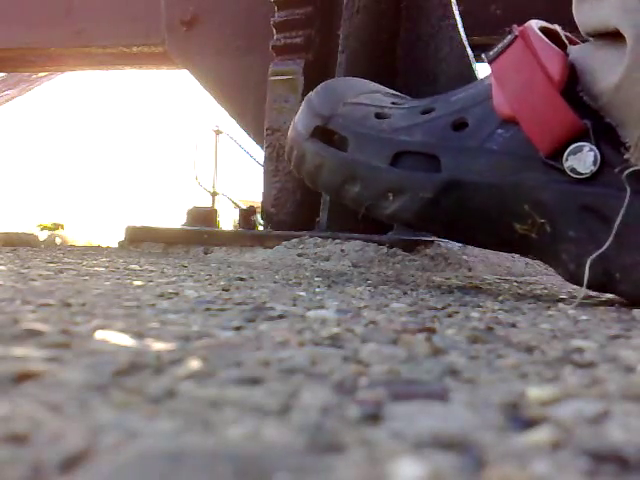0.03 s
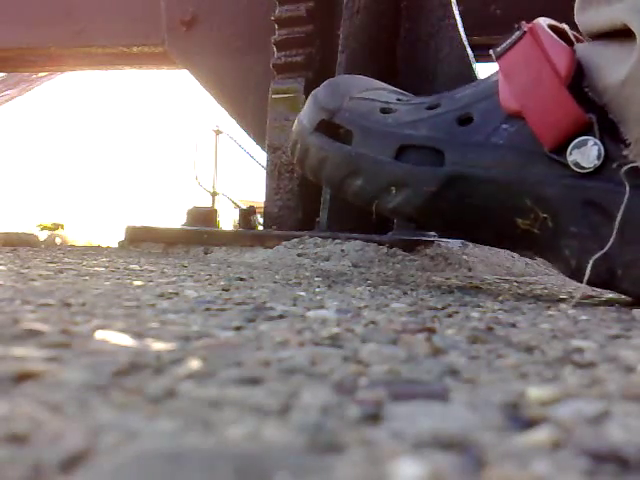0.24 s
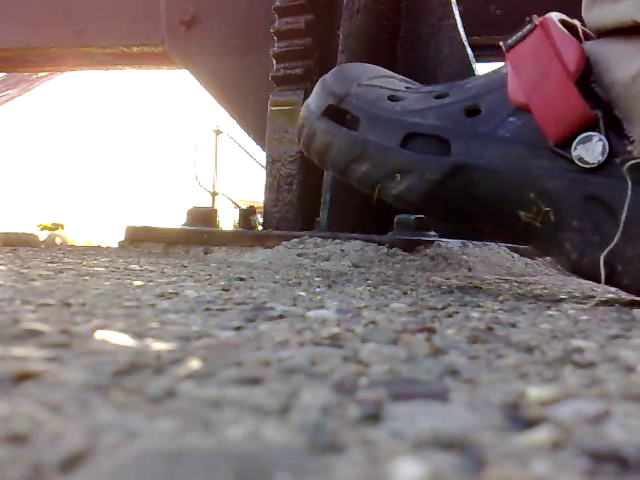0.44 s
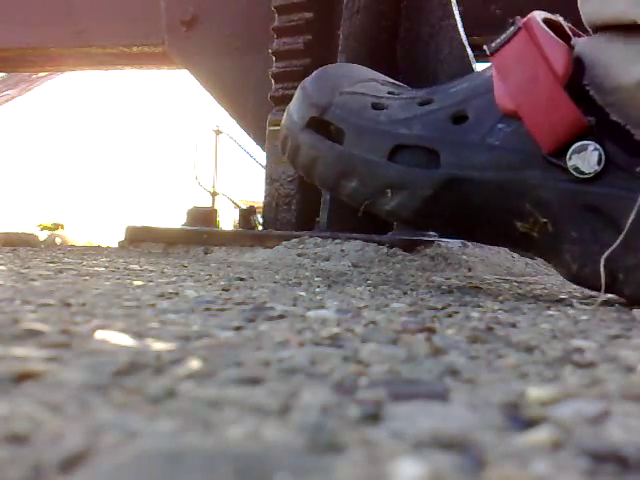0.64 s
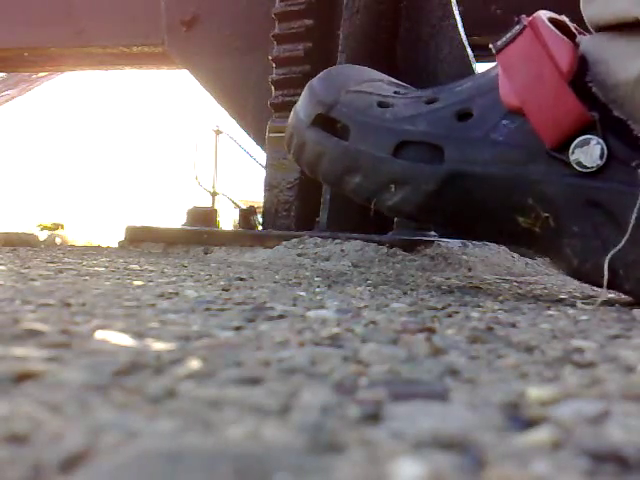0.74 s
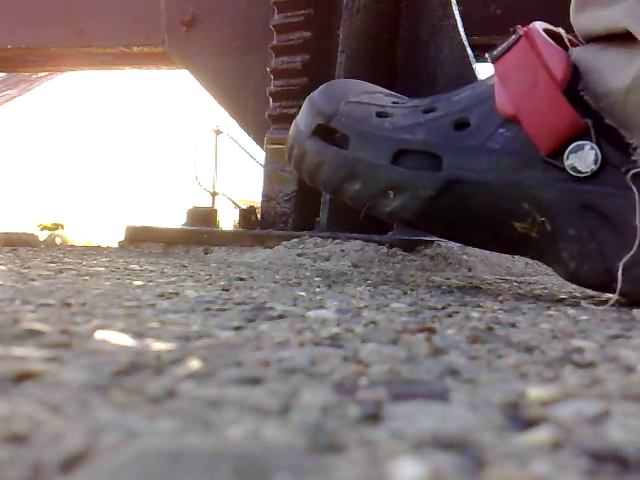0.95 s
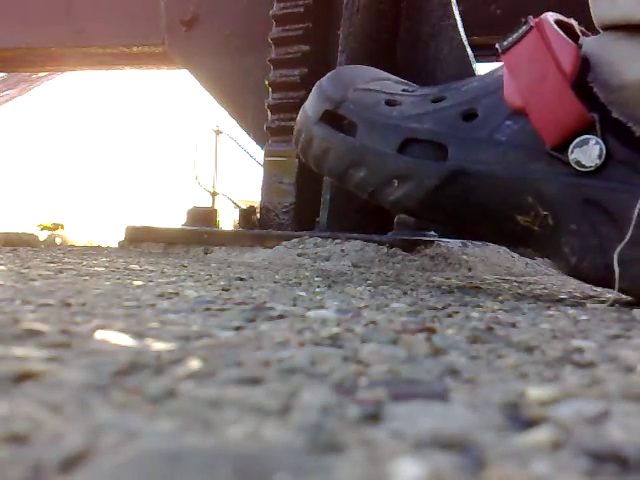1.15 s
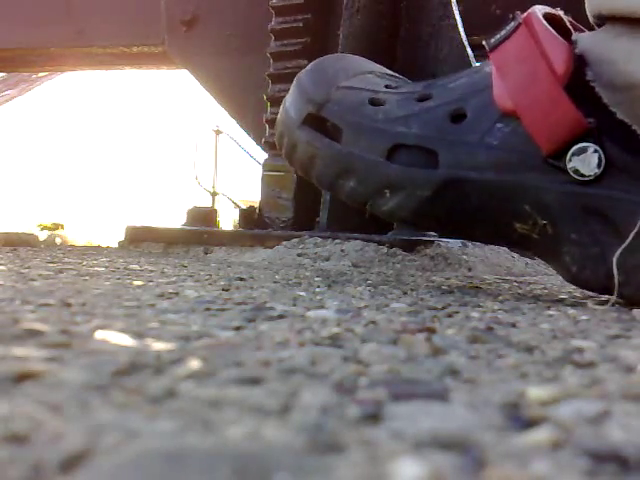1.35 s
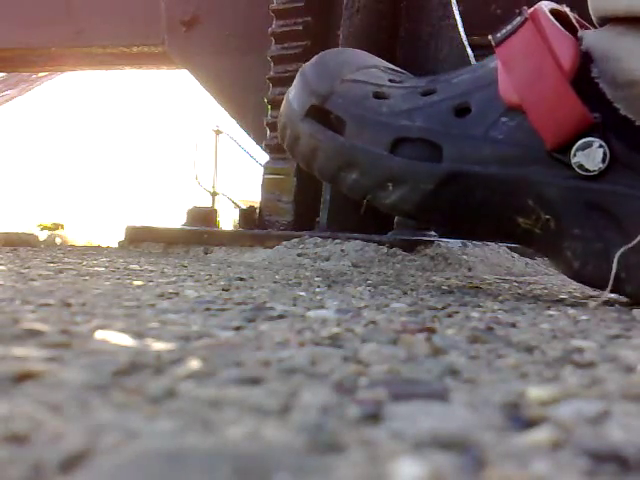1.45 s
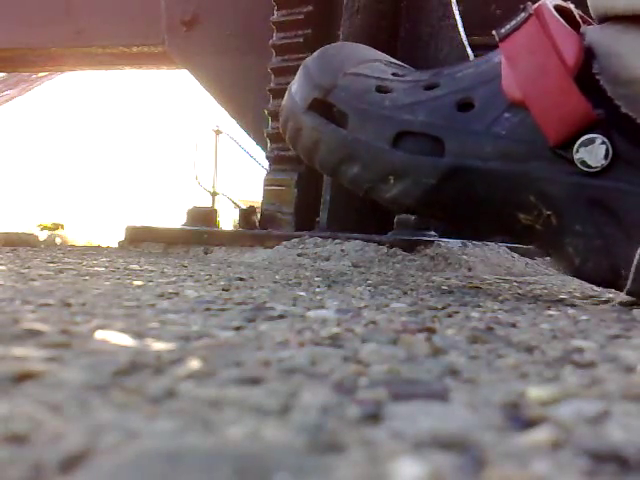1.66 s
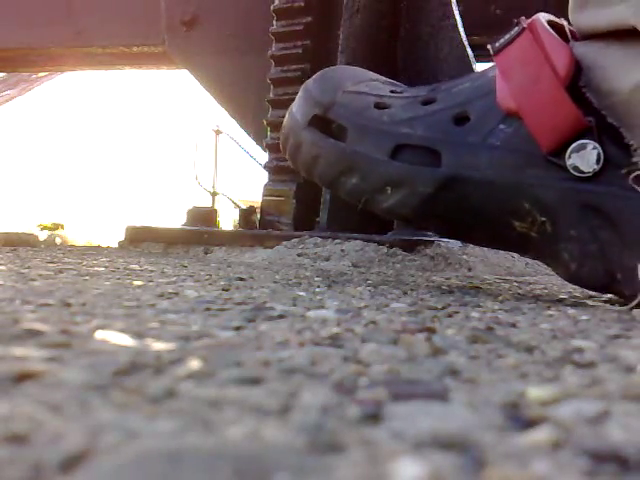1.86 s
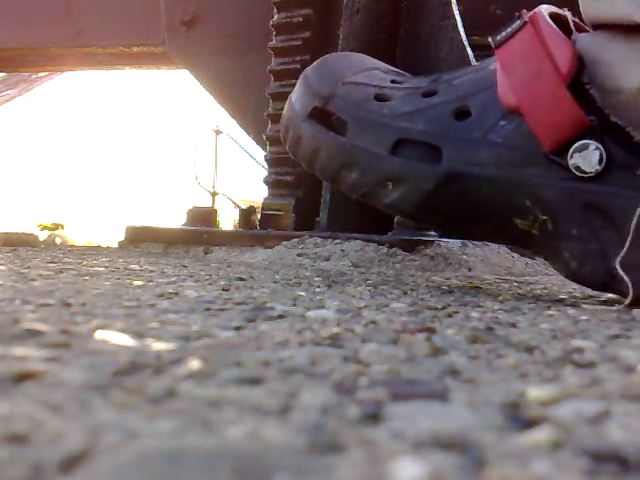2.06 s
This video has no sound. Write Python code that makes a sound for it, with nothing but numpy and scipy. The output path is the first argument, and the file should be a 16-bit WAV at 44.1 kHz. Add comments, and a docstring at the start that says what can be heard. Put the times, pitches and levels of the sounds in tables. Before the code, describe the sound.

A steel ratchet gear rattles close by in quick, uneven clicks that grow louder, with a hard knock at about 0.4 seconds. Another knock and a loud clank land just before 1 second, then a brief lull. Softer clicking resumes around 1.2 seconds with dull thumps and rusty crunches. A second loud clank comes at 1.7 seconds, then a few lighter clicks. Low water hiss and a short echo run throughout.

```python
"""A steel pawl skips and rattles over gear teeth as the rack of a canal lock paddle is wound up close by.
Each impact excites damped modes of the steel: twice the pawl drops home with a hard clank, and the rack
knocks in its guide. Rust crunches in the teeth and the gate thumps under the load. Gate and chamber
return a short echo over a low hiss of water and sliding rack; the loudest blows overload the microphone."""
import sys
import numpy as np
from scipy import signal
from scipy.fft import rfft, irfft
from scipy.io import wavfile

SR = 44100
rng = np.random.default_rng(int(sys.argv[2]) if len(sys.argv) > 2 else 0)


def wav_out(sig):
    """Save sig, one row per channel (or a flat mono array), as 16-bit PCM at SR to the path in sys.argv[1]."""
    wavfile.write(sys.argv[1], SR, np.round(np.clip(np.atleast_2d(sig).T, -1, 1) * 32767).astype(np.int16))


N = 92610

# Spectra of the hiss of water and sliding rack, and of crunching rust.
# Each row: frequency in Hz, relative spectral density in dB.
HISS_SPECTRUM = [(15, -33), (25, -7.5), (164, 0.5), (626, -4), (900, -9.5), (2380, -16.5), (4110, -25.5),
                 (9580, -44), (12600, -43), (17000, -54)]
RUST_SPECTRUM = [(1500, 10), (4500, 5.5), (8000, -11.5), (12500, -1), (17000, -30)]
# Rise and fall of the hiss as the rack rubs along. Each row: time in seconds, relative level in dB.
HISS_LEVELS = [(0, 5), (0.9, 4), (1.08, -2), (1.3, -1.5), (1.55, 4), (2.1, 0)]
# Dense vibrations: the echo of gate and chamber, the frame's knock, the pawl's tick, a clank's crack.
# Each row: frequency in Hz, relative spectral density in dB, time to decay by 60 dB (T60) in seconds.
ECHO_BANDS = [(99, 11, 0.35), (685, -4, 0.41), (4200, -5.5, 0.5), (8260, -5, 0.2)]
FRAME_BANDS = [(90.5, 0, 0.102), (185, -4.5, 0.097), (360, 6.5, 0.053), (1020, 2.5, 0.06),
               (1200, -5, 0.081), (1860, -3, 0.061), (2950, -11, 0.036), (4520, -30.5, 0.033),
               (8000, -46, 0.027)]
TICK_BANDS = [(970, 16.5, 0.058), (2560, 21.5, 0.047), (5340, 9, 0.04), (8100, -16, 0.11),
              (13000, -0.5, 0.067), (16000, -19, 0.024)]
CRACK_BANDS = [(100, -18, 0.08), (580, 12, 0.041), (4000, 2, 0.034), (5530, -13.5, 0.091),
               (12400, -23, 0.055), (16000, -36, 0.03)]
# Modes of the rack, the gear wheel, the pawl and its high ping.
# Each row: frequency in Hz, relative level in dB, T60 in seconds.
RACK_MODES = [(297, -4.5, 0.069), (637, -11.5, 0.09), (860, -3.5, 0.035), (986, 6, 0.037),
              (1280, -4, 0.061), (1597, -4, 0.11), (1916, 10.5, 0.017), (2162, 5.5, 0.033)]
WHEEL_MODES = [(613, -9.5, 0.11), (680, -7, 0.06), (872, 3, 0.045), (1110, -0.5, 0.051)]
PAWL_MODES = [(1014, -9, 0.087), (1593.5, -6.5, 0.12), (1604.6, 6.5, 0.048), (1945, -10, 0.068),
              (2256, -0.5, 0.036), (3010, -12, 0.035), (3215, -11, 0.027)]
PING_MODES = [(3780, -5, 0.017), (3918, 2, 0.029), (4170, -10, 0.011)]
# Modes of a struck tooth. Each row: multiple of its pitch, relative level in dB, T60 in seconds.
TOOTH_MODES = [(1.001, 0.5, 0.05), (1.352, -8.5, 0.027), (1.84, -2.5, 0.027)]
# Rust crunching in the teeth. Each row: start in seconds, nominal length in seconds, level in dB.
RUST_CRUNCHES = [(0.261, 0.03, -34.5), (0.98, 0.014, -23.5), (1.394, 0.0073, -29.5), (1.404, 0.03, -35.5),
                 (1.537, 0.3, -53), (1.734, 0.014, -21)]
# Steel sliding on grit. Each row: start in seconds, nominal length in seconds, level in dB, pitch in Hz.
GRIT_RASPS = [(0.855, 0.0031, -25, 12450), (1.402, 0.027, -38, 3330), (1.536, 0.074, -60, 13000)]
# The gate under load. Each row: start in seconds, thump level in dB, knock level in dB, knock pitch in Hz.
GATE_THUMPS = [(0.662, -29.5, -31.5, 434), (1.264, -33, -27, 620), (1.331, -32, -33, 384),
               (1.39, -29, -30, 326), (1.98, -33, -28.5, 470), (2.057, -29, -29, 609)]
# Slack gear bumping softly. Each row: start in seconds, level in dB.
SLACK_BUMPS = [(0.401, -32.5), (0.695, -26.5), (0.858, -30.5), (1.63, -32.5), (1.692, -27), (1.783, -31),
               (1.806, -31)]
# The rack striking its guide.
# Each row: start in seconds, levels of ring, frame knock and boom in dB, boom pitch in Hz.
RACK_KNOCKS = [(0.3589, -9.5, -14, -12.5, 394), (0.9221, -10, -9.5, -14, 442)]
# The pawl dropping home and rebounding.
# Each row: start in seconds, levels of wheel, crack, pawl ring and tooth in dB, tooth pitch in Hz.
PAWL_DROPS = [(0.9605, -16.5, -11.5, -42, -14.5, 2030), (0.9684, -16, -22.5, -16, -36, 2290),
              (1.7194, -12.5, -12, -26, -12.5, 2217), (1.7275, -19, -18.5, -21.5, -25.5, 2240)]
# The pawl skipping on the teeth. Each row: start in seconds, levels of ring, frame knock and clink in dB,
# clink pitch in Hz, levels of ping and tick in dB. Levels are relative within each column.
PAWL_SKIPS = [(0.0395, -40, -28, -55, 1880, -49, -71), (0.122, -29, -27, -30, 2170, -69, -45),
              (0.1951, -18, -26, -28.5, 2080, -41, -43), (0.2249, -20, -24.5, -18.5, 2120, -25, -33.5),
              (0.25, -4, -22, -11, 2365, -11.5, -22), (0.289, -13.5, -21.5, -40, 1910, -46, -37),
              (0.3298, -17.5, -28, -29, 1920, -52, -45), (0.4277, -29, -26, -52, 1830, -38, -50),
              (0.461, -8.5, -21.5, -19, 1944, -32.5, -38.5), (0.5034, -14, -21, -22, 1876, -55, -48),
              (0.6534, -14, -22, -45, 2230, -36, -47), (0.686, -52, -29.5, -28, 2140, -49, -47),
              (0.7064, -10, -19.5, -12, 2218, -20.5, -30), (0.743, -5.5, -19.5, -18.5, 2340, -18, -28),
              (0.7798, -12, -23, -16.5, 2010, -46, -37), (0.8133, -5, -23, -17.5, 2005, -21.5, -24.5),
              (1.164, -40, -34.5, -39.5, 2200, -52, -80), (1.2592, -44, -26.5, -45, 2150, -38, -51),
              (1.3257, -36, -30, -33.5, 2175, -46.5, -50), (1.3841, -25, -25, -28, 2100, -37, -43),
              (1.4082, -37, -48, -27.5, 2000, -49, -38.5), (1.4192, -20.5, -27.5, -26.5, 1934, -40, -48),
              (1.4542, -19.5, -27, -22, 2035, -39, -41.5), (1.4959, -18, -27, -20, 1950, -30, -36),
              (1.8399, -24.5, -28, -35, 2050, -33.5, -47), (1.9083, -38, -32.5, -31.5, 2130, -49, -74),
              (1.9761, -64, -31, -32, 2200, -41.5, -47.5), (2.0558, -25, -32, -31, 1995, -43, -55)]

RING_RISE_S, TICK_RISE_S, THUD_RISE_S = 0.0014, 0.00009, 0.0007
BOOM_RISE_S, CLANK_RISE_S = 0.007, 0.00056
FRAME_LAG_S, LAG_REF_HZ = 0.001482, 1000  # travel time of bending waves in the frame, at this frequency
AGE = np.arange(int(0.4 * SR)) / SR  # seconds since a blow


def amp(db):
    """Amplitude ratio of a level in decibels."""
    return 10 ** (np.asarray(db) / 20)


def rms(x):
    """Root-mean-square amplitude."""
    return np.sqrt(np.mean(x ** 2)) + 1e-12


def add(out, at, x):
    """Superposition: a sound joins the mix at a time in seconds."""
    i = int(at * SR)
    out[i:i + len(x)] += x[:max(len(out) - i, 0)]


def lookup(table, hz, column=1):
    """Interpolation of a spectrum on a logarithmic frequency axis."""
    table = np.array(table)
    return np.interp(np.log(np.maximum(hz, 1)), np.log(table[:, 0]), table[:, column])


def colour(x, spectrum):
    """Linear filtering: each frequency is weighted by the spectrum."""
    hz = np.fft.rfftfreq(len(x), 1 / SR)
    return irfft(rfft(x) * amp(lookup(spectrum, hz)), len(x))


def swell(length_s):
    """Envelope with a quick rise, a peak at half the nominal length and a slower fall."""
    u = 2 * AGE / length_s
    return (u * np.exp(1 - u)) ** 2


def build_up(x, rise_s):
    """Onset transient: a vibration grows in, scaled to unit RMS over its first 20 ms."""
    x = x * (1 - np.exp(-AGE / rise_s))
    return x / rms(x[:int(0.02 * SR)])


def ring(modes, rise_s, detune=0.0085, scatter_db=0):
    """Free vibration: damped modes whose pitch and strength may vary with the point of contact."""
    x = 0
    for k, (hz, db, t60) in enumerate(modes):
        higher, louder = rng.standard_normal(2)
        tone = np.sin(2 * np.pi * hz * (1 + detune * higher) * AGE)
        decay = np.exp(-np.log(1000) * AGE / t60)
        x = x + (-1) ** k * amp(db + scatter_db * louder) * tone * decay
    return build_up(x, rise_s)


def clatter(bands, rise_s, lag_s=0):
    """Modal overlap: dense modes act as decaying noise bands; given a lag, dispersion delays the lows."""
    hz = np.fft.rfftfreq(len(AGE), 1 / SR)
    noise = rfft(rng.standard_normal(len(AGE)))
    edges_hz = np.geomspace(60, 18000, 36)
    x = 0
    for lo, hi in zip(edges_hz, edges_hz[1:]):
        centre = np.sqrt(lo * hi)
        delay_s = lag_s * np.sqrt(LAG_REF_HZ / lo)  # bending wave speed goes as the root of frequency
        age = np.maximum(AGE - delay_s, 0)
        t60 = lookup(bands, centre, column=2)
        envelope = np.exp(-np.log(1000) * age / t60) * (1 - np.exp(-age * centre))
        band = irfft(noise * ((hz >= lo) & (hz < hi)), len(AGE)) * envelope
        gain = amp(lookup(bands, centre)) * np.sqrt(hi - lo)
        x = x + gain * band * rms(envelope) / rms(band)
    return build_up(x, rise_s)


def background_hiss(rumble_hz=105.5, width_hz=42):
    """Flow and friction: water and sliding rack hiss over a rumble, rising and falling as the rack rubs."""
    level_db = np.interp(np.arange(N) / SR, *np.array(HISS_LEVELS).T)
    hiss = colour(rng.standard_normal(N), HISS_SPECTRUM) * amp(level_db)
    off_centre = 2 * (np.fft.rfftfreq(N, 1 / SR) - rumble_hz) / width_hz
    rumble = irfft(rfft(rng.standard_normal(N)) / (1 + off_centre ** 2), N)
    return amp(-34.5) * hiss / rms(hiss) + amp(-44.5) * rumble / rms(rumble)


def lock_echo(sound):
    """Reverberation: the sound is convolved with the impulse response of gate and chamber."""
    response = clatter(ECHO_BANDS, rise_s=0.0014)
    return amp(-20.5) * signal.fftconvolve(sound, response / np.linalg.norm(response))[:N]


def gate(t60=0.041):
    """Damped resonance: the loaded gate gives hollow thumps, each a low mode and a higher knock."""
    out = np.zeros(N)
    for at, thump_db, knock_db, knock_hz in GATE_THUMPS:
        add(out, at, amp(thump_db) * ring([(107, 0, t60)], BOOM_RISE_S))
        add(out, at, amp(knock_db) * ring([(knock_hz, 0, t60)], BOOM_RISE_S))
    return out


def rust():
    """Fracture and friction: rust breaks in spiky bursts, and steel on grit rasps in a narrow band."""
    out, size = np.zeros(N), len(AGE)
    for at, length_s, db in RUST_CRUNCHES:
        fractures = rng.standard_normal(size) * amp(0.81 * rng.exponential(size=size))
        crunch = colour(fractures, RUST_SPECTRUM)
        add(out, at, amp(db) * crunch / rms(crunch) * swell(length_s))
    for at, length_s, db, hz in GRIT_RASPS:
        resonance = signal.iirpeak(hz, Q=5.5, fs=SR)
        friction = rng.standard_normal(size)
        rasp = signal.lfilter(*resonance, signal.lfilter(*resonance, friction))
        add(out, at, amp(db) * rasp / rms(rasp) * swell(length_s))
    return out


def rack(boom_t60=0.037):
    """Impact excitation: the rack hits its guide with a dull boom, and slack gear bumps the frame."""
    out = np.zeros(N)
    for at, ring_db, knock_db, boom_db, boom_hz in RACK_KNOCKS:
        add(out, at, amp(ring_db) * ring(RACK_MODES, THUD_RISE_S))
        add(out, at, amp(ring_db - 11.5) * clatter(TICK_BANDS, TICK_RISE_S))
        add(out, at, amp(knock_db) * clatter(FRAME_BANDS, THUD_RISE_S, FRAME_LAG_S))
        add(out, at + FRAME_LAG_S, amp(boom_db) * ring([(boom_hz, 0, boom_t60)], BOOM_RISE_S))
    for at, db in SLACK_BUMPS:
        add(out, at, amp(db) * clatter(FRAME_BANDS, RING_RISE_S))
    return out


def pawl_drops():
    """Coupled vibration: a hard blow cracks and rings the struck tooth; wheel and pawl follow."""
    out = np.zeros(N)
    for at, wheel_db, crack_db, pawl_db, tooth_db, tooth_hz in PAWL_DROPS:
        tooth = [(tooth_hz * ratio, db, t60) for ratio, db, t60 in TOOTH_MODES]
        add(out, at, amp(tooth_db) * ring(tooth, CLANK_RISE_S))
        add(out, at, amp(crack_db) * clatter(CRACK_BANDS, CLANK_RISE_S, FRAME_LAG_S))
        add(out, at + FRAME_LAG_S, amp(wheel_db) * ring(WHEEL_MODES, rise_s=0.0011))
        add(out, at + FRAME_LAG_S, amp(pawl_db) * ring(PAWL_MODES, RING_RISE_S, detune=0))
    return out


def pawl_skips(clink_t60=0.026, sing_at=1.497, sing_hz=1890, sing_t60=0.11):
    """Wave propagation: each skip clinks, pings and ticks at once; knock and ring follow as waves spread."""
    out = np.zeros(N)
    for at, ring_db, knock_db, clink_db, clink_hz, ping_db, tick_db in PAWL_SKIPS:
        clink = amp(clink_db - 5) * ring([(clink_hz, 0, clink_t60)], rise_s=0.0032)
        ping = amp(ping_db - 4.5) * ring(PING_MODES, CLANK_RISE_S, scatter_db=4.5)
        tick = amp(tick_db + 3.5) * clatter(TICK_BANDS, TICK_RISE_S)
        knock = amp(knock_db) * clatter(FRAME_BANDS, RING_RISE_S, FRAME_LAG_S)
        ringing = amp(ring_db - 10) * ring(PAWL_MODES, RING_RISE_S, detune=0.003, scatter_db=4.5)
        add(out, at, clink + ping + tick + knock)
        add(out, at + FRAME_LAG_S, ringing)
    # once the pawl hangs free and sings on
    add(out, sing_at, amp(-20.5) * ring([(sing_hz, 0, sing_t60)], RING_RISE_S, detune=0))
    return out


def scene():
    """Superposition: the direct sound of the winding, its echo and the hiss add in one channel."""
    direct = pawl_skips() + rack() + gate() + pawl_drops() + rust()
    return (direct + lock_echo(direct) + background_hiss())[None]


def record(dry, ceiling=1.13, knee=3.26, top_hz=17000):
    """Saturation and band limiting: the microphone rounds the loudest peaks and cuts the top."""
    rounded = dry / (1 + np.abs(dry / ceiling) ** knee) ** (1 / knee)
    lowpass = signal.ellip(8, 0.2, 70, top_hz, fs=SR, output="sos")
    return signal.sosfilt(lowpass, rounded)


dry = scene()
out = record(dry)
wav_out(out)
```